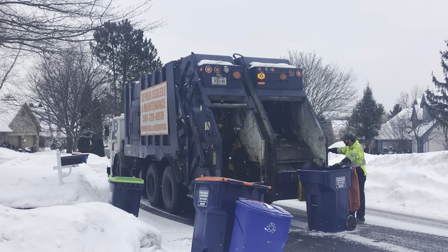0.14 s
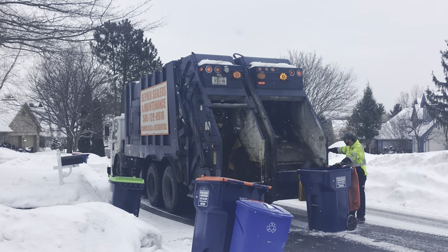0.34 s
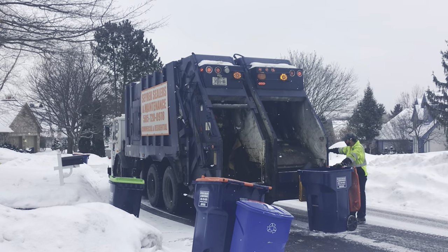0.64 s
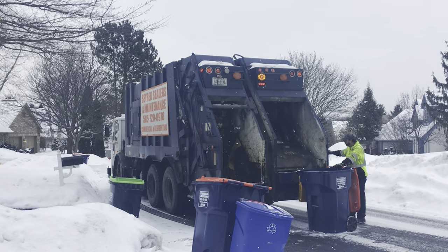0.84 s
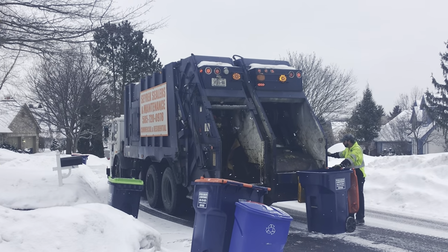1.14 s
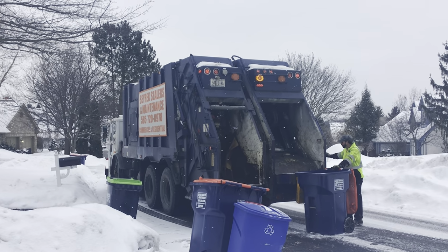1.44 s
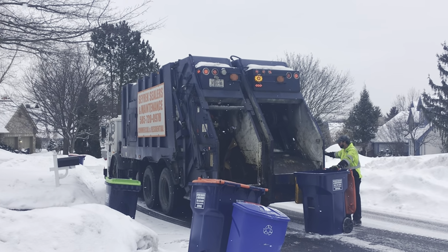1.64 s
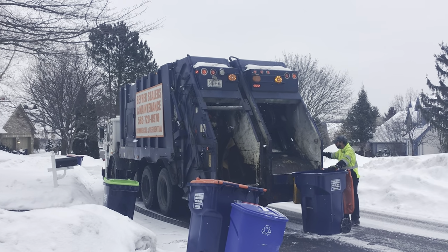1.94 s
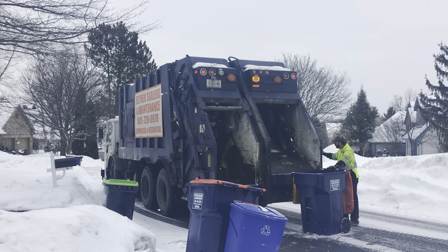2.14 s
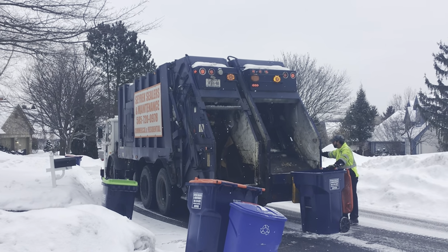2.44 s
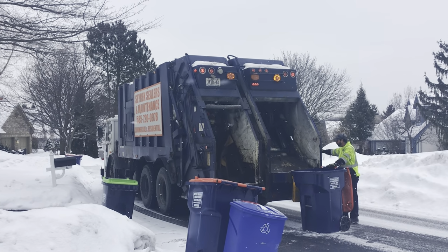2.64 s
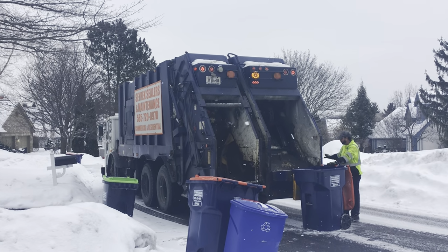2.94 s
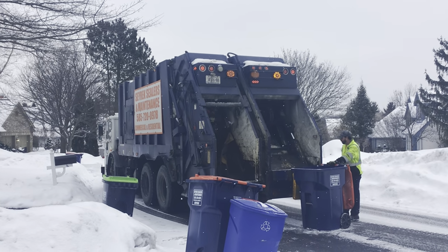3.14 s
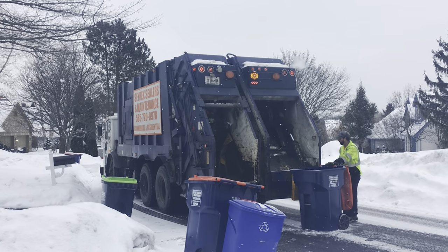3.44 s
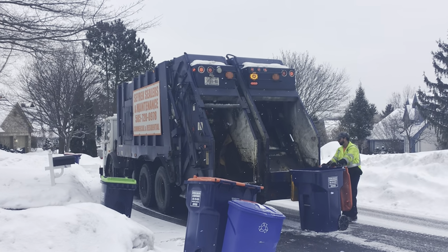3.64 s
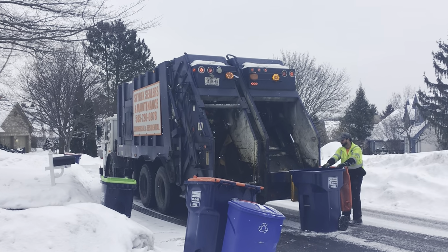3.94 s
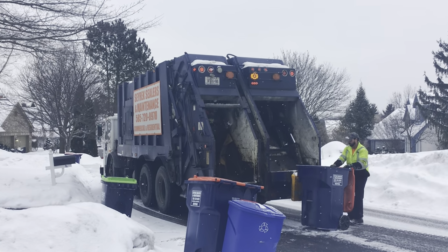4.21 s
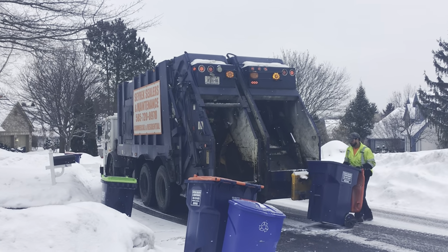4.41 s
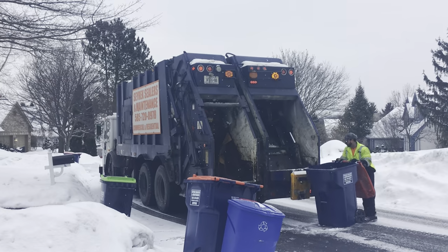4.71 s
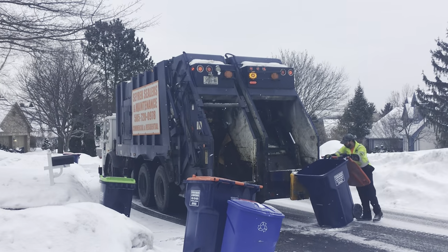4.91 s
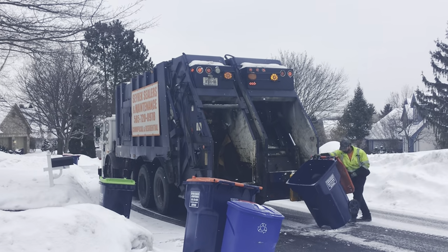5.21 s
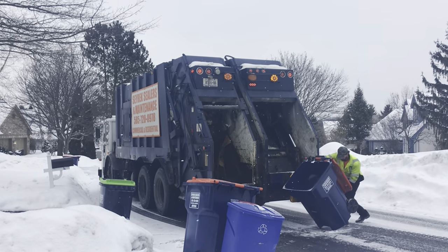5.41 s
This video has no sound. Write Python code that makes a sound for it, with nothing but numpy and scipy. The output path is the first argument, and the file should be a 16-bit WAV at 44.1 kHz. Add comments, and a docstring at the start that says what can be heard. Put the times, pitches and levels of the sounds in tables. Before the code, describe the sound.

A diesel garbage truck idles with its hydraulics working while rubbish ticks and a plastic wheeled bin thumps hollowly on the road.

```python
"""On a snowy street, a diesel rubbish truck runs at fast idle; its hydraulics work, then ease off.
The turning engine hums and clatters in time with its firings; the load adds hiss and fizz.
A ram (the hydraulic piston) squeaks faintly, and rubbish ticks and rustles in the truck's hopper.
A plastic wheeled bin is dropped and tipped on the road, and each blow makes its hollow body ring."""
import sys
import numpy as np
from scipy import signal
from scipy.fft import rfft, irfft, next_fast_len
from scipy.io import wavfile
from scipy.ndimage import uniform_filter1d, map_coordinates

SR = 44100
rng = np.random.default_rng(int(sys.argv[2]) if len(sys.argv) > 2 else 0)


def persist_wave(psi):
    """Save psi, clipped to +-1, as 16-bit WAV."""
    counts = np.round(np.clip(psi, -1, 1) * 32767).astype(np.int16)
    wavfile.write(sys.argv[1], SR, np.atleast_2d(counts).T)


N = 245637

# The engine's main hum (9 cycles per shaft turn) and its work: t/s, f/Hz, level/dB, hydraulic load/dB
ENGINE = [(0, 163.5, -31.5, -3), (.9, 163.5, -33, 3.5), (1.6, 163.5, -31, -1), (1.9, 165, -32, -3.5),
          (2.3, 165.5, -31.5, -6.5), (2.75, 165, -36, -2.5), (2.95, 165, -32.5, -13.5),
          (3.15, 165, -48.5, -15), (3.45, 164, -34.5, -16), (3.6, 164, -37.5, -17),
          (3.9, 163.5, -34.5, -19), (4.5, 163.5, -35, -16), (5.57, 163.5, -37.5, -25)]
# Tone colour of tiny bright bits of rubbish: f/Hz, level/dB
GLINT_COLOUR = [(9000, -27), (12000, -9), (14000, 4), (16000, 3)]


def amp(db):
    """Turn decibels into a number to multiply by."""
    return np.exp(np.asarray(db) * np.log(10) / 20)


def unit(x):
    """Scale a signal to an average strength (rms) of 1."""
    return x / np.sqrt(np.mean(x ** 2) + 1e-20)


def curves(rows):
    """Join a table's points: one value per sample for each column after the time."""
    times, *columns = np.transpose(rows)
    return [np.interp(np.arange(N) / SR, times, column) for column in columns]


def wobble(rate):
    """A smooth curve through `rate` random points a second."""
    coarse = np.arange(0, N + 32, 32)
    points = rng.standard_normal(int(N * rate / SR) + 4)
    return np.interp(np.arange(N), coarse, map_coordinates(points, [coarse * rate / SR]))


def filtered(x, response):
    """Multiply each frequency in x by response(hz)."""
    size = next_fast_len(N + SR // 2)
    return irfft(rfft(x, size) * response(np.fft.rfftfreq(size, 1 / SR)), size)[:N]


def noise(colour, patchy_db):
    """Noise of strength 1 with a tone colour (f/Hz, level/dB) and random louder and softer patches."""
    spectra = signal.stft(rng.standard_normal(N), nperseg=512)[2]
    patches = uniform_filter1d(rng.standard_normal(spectra.shape), size=6, axis=0)
    patches = uniform_filter1d(patches, size=12, axis=1)
    white = signal.istft(spectra * amp(patchy_db * unit(patches)), nperseg=512)[1][:N]
    f, db = np.transpose(colour)
    return unit(filtered(white, lambda hz: amp(np.interp(np.log(hz + 1), np.log(f), db, -120, -120))))


def engine_hum(shaft, hum_db, load_db):
    """The engine makes wavering tones at multiples of its shaft speed."""
    # Tones that swell with the load: multiple, level/dB at a load of 0 dB
    loaded = [(5, -48.5), (7, -45), (10, -44), (11, -67), (12, -39), (13, -74), (14, -53.5), (17, -50.5),
              (18, -42), (20, -49.5), (21, -54.5), (27, -56)]
    # Throbbing exhaust tones: multiple, level/dB
    exhaust = [(6, -49.5), (7.5, -48.5), (10.5, -49), (16, -61.5), (24, -74.5)]

    def tone(multiple, db, waver_db):
        lag = 0.12 * (multiple - 9) ** 2  # pipe and panels delay each tone differently
        strength = np.sqrt(2) * amp(db + waver_db * wobble(12))
        return strength * np.cos(multiple * shaft - lag + 0.33 * wobble(3.99))

    hum = tone(9, hum_db, waver_db=2.5)
    hum += sum(tone(multiple, db + load_db, waver_db=2) for multiple, db in loaded)
    return hum + sum(tone(multiple, db, waver_db=5.5) for multiple, db in exhaust)


def truck_rumble(shaft):
    """A deep rumble and the boom of the truck's body throb on every second firing."""
    # The bass swells as hopper and bin move: t/s, rumble level/dB, boom level/dB (both relative)
    swells = [(0, -29, -34.5), (.4, -36, -36.5), (1, -38.5, -37), (1.54, -39.5, -35), (1.86, -31, -36),
              (2.02, -35, -40.5), (2.26, -34.5, -37.5), (2.7, -37, -32), (3.15, -39, -48.5),
              (3.45, -41.5, -44), (3.75, -36.5, -43.5), (4.27, -38.5, -38.5), (4.55, -27.5, -33),
              (4.76, -32.5, -38.5), (5.1, -35.5, -40.5), (5.3, -39, -32.5), (5.46, -36, -36.5),
              (5.57, -24, -40)]
    # Tone colours of the rumble and the boom: f/Hz, level/dB
    rumble_colour = [(20, -44), (35, -19.5), (55, -5.5), (80, -7), (120, -5), (160, -7.5), (200, -23),
                     (260, -48.5)]
    boom_colour = [(130, -16), (180, -1), (230, 0), (300, -6.5), (380, -14.5), (450, -11.5), (600, -63)]
    rumble_db, boom_db = curves(swells)
    throb_db = 1.6 * np.cos(1.5 * shaft) + 1.1 * wobble(9)
    rumble = amp(rumble_db + throb_db) * noise(rumble_colour, patchy_db=1.5)
    boom = amp(boom_db - 2.5 + throb_db) * noise(boom_colour, patchy_db=1.5)
    return rumble + boom


def clatter_and_hiss(shaft, load_db):
    """Clatter and hiss pulse as the engine fires; they and a high fizz grow with the hydraulic load."""
    # Tone colours of the working truck's three noises: f/Hz, level/dB
    clatter_colour = [(210, -20), (350, -12), (458, -8.5), (493, -3), (651, -5.5), (706, -4), (845, -11.5),
                      (1230, -11), (1610, -16.5), (2020, -17.5), (3000, -30.5), (3900, -43.5), (6600, -120)]
    hiss_colour = [(1470, 2), (2500, 1), (2710, -2), (2930, 0), (3170, 0.5), (3830, -0.5), (4140, -3.5),
                   (4570, -3.5), (7000, -10.5), (9100, -73), (15400, -120)]
    fizz_colour = [(4120, -29.5), (7000, -18.5), (7250, -2), (8560, 3.5), (10200, -0.5), (15000, -1),
                   (16000, 5)]
    firing = np.cos(3 * shaft)  # three firings per turn
    clatter = amp(-43.5 + 0.092 * load_db + 0.49 * firing + 0.75 * wobble(10))
    clatter *= noise(clatter_colour, patchy_db=0.35)
    hiss = amp(-52.5 + 0.32 * load_db + 0.38 * firing + 0.6 * wobble(25.11))
    hiss *= noise(hiss_colour, patchy_db=0.8)
    fizz = amp(-59 + 0.47 * load_db + 0.32 * wobble(29.94)) * noise(fizz_colour, patchy_db=1.0)
    return clatter + hiss + fizz


def ram_squeaks():
    """The ram gives faint metal squeals that waver in pitch and break up."""
    # Squeals: t/s, length/s, f/Hz, level/dB
    squeals = [(0, .03, 4450, -60), (.07, .42, 4460, -65), (1.88, .12, 4500, -65), (2.08, .15, 4470, -65),
               (2.235, .06, 4440, -62), (2.31, .06, 4420, -62), (3.78, .5, 3600, -68),
               (4.765, .03, 9450, -70)]
    t, squealing = np.arange(N) / SR, np.zeros(N)
    drift_cycles = np.cumsum(20 * wobble(60)) / SR
    flicker = amp(3 * wobble(50))
    for start, length, hz, db in squeals:
        swell = np.sin(np.pi * np.clip((t - start) / length, 0, 1)) ** (1 / 4)
        squealing += np.sqrt(2) * amp(db) * swell * np.sin(2 * np.pi * (hz * t + drift_cycles))
    return flicker * squealing


def ticks_and_scrapes():
    """Rubbish, lid and wheels make grainy bursts on contact; the low part outlasts the treble."""
    # Sharp ticks: t/s, relative crackle level/dB, body/dB and sizzle/dB compared with the crackle
    ticks = [(0.0245, -31.5, 11, -10), (.0756, -38.5, 0, -1.5), (.2467, -33, 1.5, -1.8),
             (0.425, -40, 8, -19.5), (.601, -39.5, -3, -2), (.6786, -36.5, 5, 1), (.709, -33.5, 1, -1.1),
             (.9058, -24, 2.5, -5.5), (.955, -55, 3, 6), (.9858, -45, 6, 7), (1.037, -37, 8, -2.5),
             (1.2538, -36, 2, -11), (1.33, -38.5, 6.5, -16), (1.5906, -38, -6, -2), (1.6012, -39.5, -6, 1),
             (1.6114, -39, -8.5, -7), (1.741, -37, 6, 2.5), (2.0044, -33, 5, -5), (2.2665, -39.5, 2, -1.5),
             (2.287, -45, 10, 1), (2.4494, -54, 0, 8), (2.8794, -44, 13, -11), (3.1664, -54, 0, 3),
             (3.913, -41, 6, -20.5), (4.1525, -46, 0, -17), (4.1993, -37, 7, -25), (4.2366, -37, 9.5, -25),
             (4.4993, -38, 11, -19), (4.519, -33, 3, -9), (4.5862, -38, 4, -11), (4.707, -40, 13, -18.5),
             (4.7294, -40, 15, -18), (5.237, -26, 5, -5.5), (5.2673, -46, 11, -25),
             (5.293, -38.5, 10.5, -25), (5.3897, -43.5, 17, -5), (5.4816, -36, 2, -4.5),
             (5.516, -37, 5.5, -25)]
    # Slower scrapes and crunches: the same columns, then rise/s
    scrapes = [(.012, -40, 5, -1.5, .005), (.035, -58, 23, -11.5, 0.0067), (.914, -37.5, -15, -6, .004),
               (1.694, -32, 6, -4, 0.013), (1.75, -40, 7.5, -8.5, 0.024), (2.009, -46, 8, -2, 0.015),
               (2.11, -42, 8.5, -4, 0.0087), (2.381, -44, 6, 3, 0.011), (2.415, -42, 10, -17.5, 0.044),
               (2.605, -37.5, 4, -12, 0.016), (2.633, -30.5, 5, -5, 0.0055),
               (2.693, -34.5, 7.5, -3, 0.0069), (2.72, -55, 4, 4, .018), (4.425, -52, 22.5, -14.5, 0.0064),
               (4.64, -26.5, 12.5, -6, 0.0053), (4.652, -27.5, 17, -6, 0.0079), (4.68, -38.5, 13, -5, .006),
               (4.735, -47.5, 15.5, -13, 0.013), (5.249, -36.5, 15, -15, .006),
               (5.313, -47, 21.5, -22, .005), (5.335, -58, 22.5, -20.5, .008),
               (5.42, -56.5, 20, -15.5, 0.089)]
    # Tone colours of a contact's low, high and very high parts: f/Hz, level/dB
    body = [(210, -37), (350, -10.5), (529, -5.5), (606, -4.5), (908, -10.5), (1410, -11), (1750, -16.5),
            (1830, -20.5), (1980, -16), (3000, -33.5), (3900, -59), (6600, -120)]
    crackle = [(1500, -3), (2800, 5), (4500, 0), (6500, -3), (9000, -14.5), (12000, -18.5), (16000, -42)]
    sizzle = [(6000, -20), (8500, 2.5), (11000, -2), (13500, -2), (16000, -13)]
    colours, fade_scales = (body, crackle, sizzle, GLINT_COLOUR), (1.49, 0.92, 0.64, 0.6)
    tick_rise_s, tick_fade_s = 0.00062, 0.055
    contacts = [(*row, tick_rise_s, tick_fade_s) for row in ticks]
    contacts += [(*row, 0.058 + 6.1 * row[-1]) for row in scrapes]  # a slow rise also fades slowly
    t, envelopes = np.arange(SR // 3) / SR, np.zeros((4, N + SR))
    for start, db, body_db, sizzle_db, rise_s, fade_s in contacts:
        glint_db = -2 + 1.9 * sizzle_db  # small bright bits glint, the bin does not
        part_dbs = (body_db, 0, sizzle_db, glint_db)
        for envelope, part_db, fade_scale in zip(envelopes, part_dbs, fade_scales):
            fall_db = -60 * t / (fade_scale * fade_s)
            tail = amp(-16.5 + fall_db / 3.4)  # weaker but longer
            burst = (1 - np.exp(-t / rise_s)) * (amp(fall_db) + tail)
            envelope[round(start * SR):][:len(t)] += amp(db + part_db - 10) * burst / burst.max()
    grain = amp(1.97 * wobble(400))
    parts = [envelope[:N] * noise(colour, patchy_db=1.0) for envelope, colour in zip(envelopes, colours)]
    return grain * sum(parts)


def hollow_blows():
    """A blow rings the hollow bin or hopper, most strongly near the pitch that the contact drives."""
    # Blows: t/s, relative level/dB, driven f/Hz
    blows = [(.026, -19, 643), (.04, -36, 149), (.078, -26, 700), (.6, -31, 448), (.909, -16.5, 2010),
             (1.722, -23, 450), (1.738, -17.5, 300), (1.76, -24, 350), (1.79, -17, 245), (2.44, -26, 220),
             (2.638, -33, 1300), (2.668, -22, 253), (2.887, -21, 197), (4.511, -21, 199),
             (4.645, -12.5, 390), (4.654, 0, 88.5), (4.656, -19, 1300), (4.668, -5, 173), (4.689, -10, 168),
             (4.708, -25, 700), (4.721, -24, 80), (4.73, -15, 700), (4.737, -9, 123), (4.755, -20.5, 1500),
             (4.785, -32, 1200), (4.825, -29, 800), (4.9, -28, 800), (5.237, -22, 1500), (5.243, -5.5, 123),
             (5.258, -20, 270), (5.272, -26, 720), (5.296, -28, 1500), (5.317, -27, 760),
             (5.319, -18.5, 1550), (5.335, -24, 700), (5.36, -23.5, 1550), (5.39, -23, 120),
             (5.391, -19.5, 1400), (5.5, -19.5, 119)]
    # Notes the hollow body rings at: f/Hz, relative level/dB, time to fade by 60 dB/s
    notes = [(76.5, 3, 0.4), (88.5, -5.5, 0.25), (113.5, 5, 0.16), (131.5, 0.5, 0.12), (197.4, 2, 0.12),
             (271.3, -1.5, 0.17), (310.5, -10.5, 0.26), (351.8, -1.5, 0.068), (406.3, -5.5, 0.21),
             (498, -21, 0.11), (606, -1.5, 0.082), (739, 4, 0.064), (905, -20, 0.1), (1316, -29, 0.053),
             (1466, -9.5, 0.063), (1500, 0, 0.03), (1856.3, -9, 0.058), (2212, -9, 0.036)]
    t, ringing = np.arange(SR // 3) / SR, np.zeros(N + SR)
    hz, note_db, fade_s = np.transpose(notes)
    attack = 1 - np.exp(-t / 0.0021)
    rings = amp(-60 * t / fade_s[:, None]) * np.sin(2 * np.pi * hz[:, None] * t) * attack
    for start, db, driven_hz in blows:
        scatter_db = 1.1 * rng.standard_normal(len(notes))  # no two blows sound alike
        off_pitch_db = -9 * np.log2(hz / driven_hz) ** 2
        ringing[round(start * SR):][:len(t)] += amp(db - 7 + note_db + scatter_db + off_pitch_db) @ rings
    return ringing[:N]


def rubbish_flakes(load_db):
    """Tiny flakes tick brightly at random moments, growing quieter as the load eases."""
    flakes_per_s, fade_s = 22, 0.02
    gaps, sizes = -np.log(1 - rng.random((300, 2))).T  # mostly small, now and then large
    starts = np.cumsum(gaps * SR / flakes_per_s).astype(int)
    strengths = amp(-59.5 + 4.5 * sizes)
    clicks = np.bincount(starts[starts < N], strengths[starts < N], minlength=N)
    envelope = signal.lfilter([1], [1, -amp(-60 / (fade_s * SR))], clicks)  # each click dies away
    return amp(load_db) * envelope * noise(GLINT_COLOUR, patchy_db=4.0)


def scene():
    """Add up all the sounds; the hits echo once off the truck's steel side."""
    hum_hz, hum_db, load_db = curves(ENGINE)
    shaft = 2 * np.pi * np.cumsum(hum_hz / 9) / SR  # angle of the turning shaft
    hits = ticks_and_scrapes() + hollow_blows()
    echo = amp(-18) * np.pad(hits, (round(0.023 * SR), 0))[:N]  # 23 ms later
    truck = engine_hum(shaft, hum_db, load_db) + truck_rumble(shaft) + clatter_and_hiss(shaft, load_db)
    return (truck + ram_squeaks() + rubbish_flakes(load_db) + hits + echo)[None]


def record(dry):
    """The microphone drops the deep bass, rounds off the loudest peaks and loses the highest treble."""
    bass_cut_hz, peak_limit, top_hz = 40, 1.05, 15900
    thin = filtered(dry[0], lambda hz: (1j * hz / (bass_cut_hz + 1j * hz)) ** 4)
    rounded = thin / (1 + np.abs(thin / peak_limit) ** 6) ** (1 / 6)
    return filtered(rounded, lambda hz: hz < top_hz)[None]


dry = scene()
out = record(dry)
persist_wave(out)
```